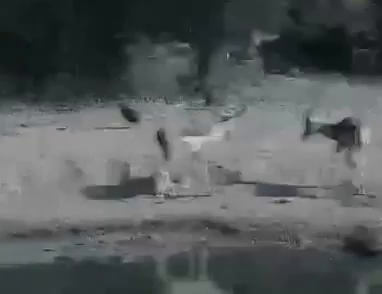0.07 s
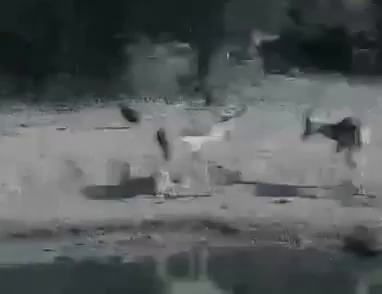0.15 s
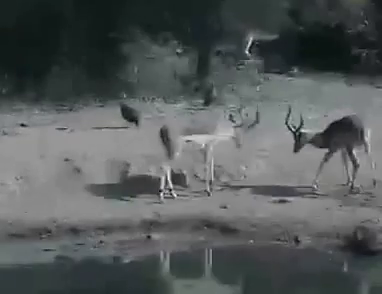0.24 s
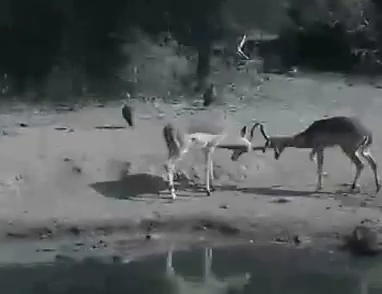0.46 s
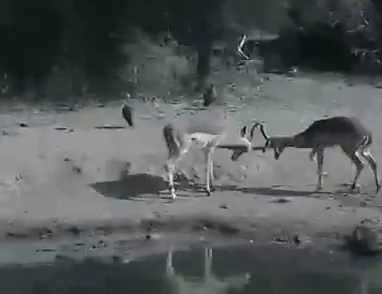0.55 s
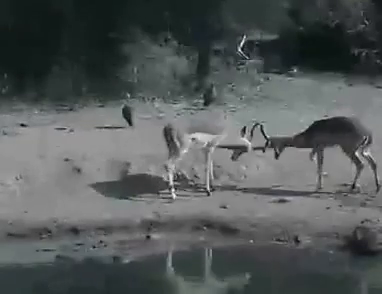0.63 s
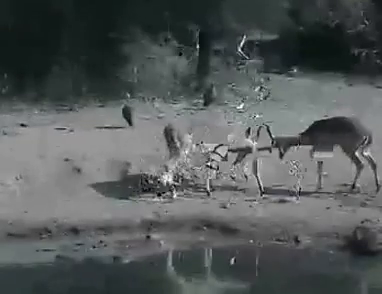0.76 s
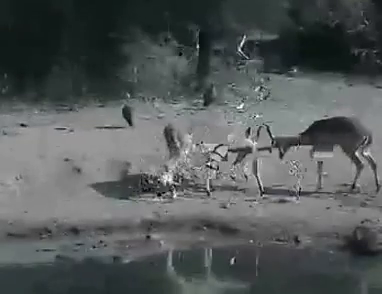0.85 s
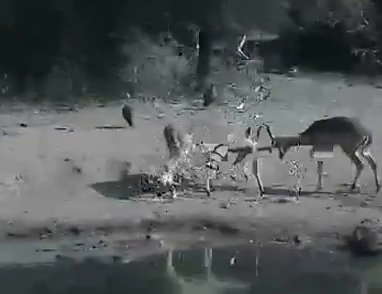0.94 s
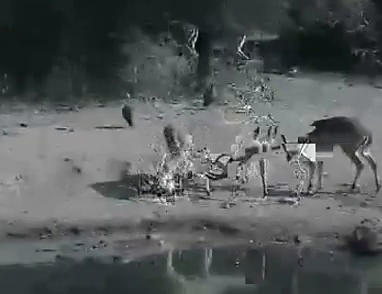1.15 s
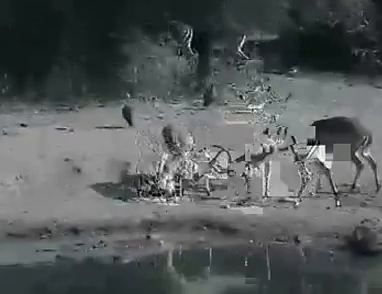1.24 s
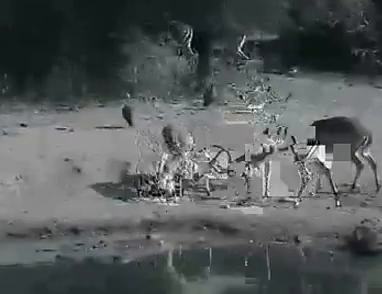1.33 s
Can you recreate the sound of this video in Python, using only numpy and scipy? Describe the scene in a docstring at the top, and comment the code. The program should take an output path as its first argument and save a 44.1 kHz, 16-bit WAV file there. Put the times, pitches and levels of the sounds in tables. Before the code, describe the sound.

A brief clatter of hollow horns clashing, over small bird calls and a quiet outdoor hush.

```python
"""Two impalas clash horns at a waterhole: each impact excites the damped modes of a hollow horn,
giving a quick rattle of knocks, some with a hard click from the sheath and a rasp from the ridges.
Hooves scuff the sand with friction noise. Birds add harsh harmonic chips and gliding pure tones.
The bush scatters these sounds back as a faint reverberation, over a steady outdoor hush."""
import sys
import numpy as np
from scipy import signal
from scipy.fft import rfft, irfft, next_fast_len
from scipy.io import wavfile
from scipy.ndimage import map_coordinates

SR = 44100
rng = np.random.default_rng(int(sys.argv[2]) if len(sys.argv) > 2 else 0)


def to_wav(s):
    """Save 16-bit WAV."""
    ch = np.atleast_2d(s).T  # columns
    pcm = np.round(np.clip(ch, -1, 1) * 32767)  # PCM
    wavfile.write(sys.argv[1], SR, pcm.astype(np.int16))


N = 61739
T = np.arange(N) / SR
EVENT_T = np.arange(SR // 6) / SR  # seconds within one knock or note


# Modes of the hollow horn. Each row: ratio to the pitch, level in dB, factor on the time to peak.
HORN_MODES = [(.77, -14.5, 2.03), (1, 1.5, 0.91), (1.18, -21, 1.5), (2.05, -25.5, 2.4), (2.38, -23.5, 1.4),
              (4, -36, 0.8)]

def horn_ring(pitch_hz, peak_s):
    """Modal resonance: each strongly damped mode swells to a peak and dies almost as fast."""
    steepness, scatter_db = 3.6, 0  # at zero scatter every knock has the same balance of modes
    ring = 0
    for ratio, db, stretch in HORN_MODES:
        age = EVENT_T / (peak_s * stretch)
        envelope = amp(rng.normal(db, scatter_db)) * (age * np.exp(1 - age)) ** steepness
        ring += envelope * np.sin(2 * np.pi * ratio * pitch_hz * EVENT_T)
    return ring


# Modes of the hard sheath. Each row: frequency in Hz, level in dB, 60 dB decay time in seconds.
SHEATH_MODES = [(1640, -12, 0.0063), (2740, -8.5, 0.0094), (4000, -13, 0.0085), (4800, -21, 0.0064),
                (5820, -20, 0.0082)]

def sheath_click():
    """Free vibration: the struck sheath's high modes decay exponentially within milliseconds."""
    return sum(amp(db) * fade(EVENT_T, t60) * np.sin(2 * np.pi * (hz * EVENT_T + rng.random()))
               for hz, db, t60 in SHEATH_MODES)


# Horn contacts. Each row: start in seconds, ring level in dB, pitch in Hz,
# time to the ring's peak in seconds, click level in dB.
CONTACTS = [(.2189, -14, 655.7, 0.0026, -28), (.2237, -50, 780, 0.0022, -11.5),
            (.2251, -17, 690, .0034, -33), (.2478, -32, 680, 0.0033, -27.5), (.2522, -37, 670, 0.0039, -53),
            (.2785, -33.5, 594, 0.0023, -34), (.2832, -28.5, 582, 0.0029, -29),
            (.2950, -28, 706, .003, -40), (.3133, -17, 660.5, 0.0054, -34),
            (.3212, -17.5, 724.4, 0.0055, -47), (.3269, -28, 758, 0.0034, -44),
            (.3305, -36, 774, 0.0017, -38), (.3364, -48, 685, 0.0021, -46),
            (.3408, -22.5, 678, 0.0027, -45), (.3459, -22.5, 700, 0.0023, -40),
            (.3518, -33, 666, 0.0037, -50), (.4108, -25, 572, .0027, -36), (.4162, -28.5, 515, .0033, -37),
            (.4252, -26, 637, .0031, -52), (.4355, -38, 523, 0.0026, -50)]
# Spectrum of horn rubbing on horn. Each row: frequency in Hz, relative level in dB.
FRICTION_SPECTRUM = [(300, -2), (1000, 0), (1650, 5.5), (2200, -3.5), (2700, 3.5), (3400, -6.5),
                     (4200, -3.5), (6200, -11.5), (7400, -19), (10500, -25)]

def horns():
    """Impact and friction: each contact clicks, rasps and rings at a pitch set by where it lands."""
    rise_s, burst_db, burst_t60_s = 0.00057, -6, 0.006
    rasp_db, rasp_t60_s = -21, 0.036
    cutoff_hz = 414  # a slender horn radiates little below this
    modes, friction = np.zeros(N), np.zeros(N)
    attack = 1 - np.exp(-EVENT_T / rise_s)
    for start, ring_db, pitch_hz, peak_s, click_db in CONTACTS:
        ring = amp(ring_db) * horn_ring(pitch_hz, peak_s)
        click = amp(click_db) * attack * sheath_click()
        add(modes, start, ring + click)
        burst = amp(click_db + burst_db) * fade(EVENT_T, burst_t60_s)  # the noisy part of the click
        rasp = amp(ring_db + rasp_db) * fade(EVENT_T, rasp_t60_s)  # the ridges scrape on
        add(friction, start, attack * (burst + rasp))
    clash = modes + friction * noise(FRICTION_SPECTRUM)
    return filtered(clash, lambda hz: 1 - 1 / (1 + (hz / cutoff_hz) ** 10))


# Hoof scuffs. Each row: centre in seconds, half-width in seconds, level in dB.
HOOF_SCUFFS = [(.025, 0.012, -44), (0.883, .006, -41.5), (0.913, 0.018, -47), (1.204, 0.0036, -46),
               (1.366, 0.014, -49.5)]
# Spectrum of scuffed sand. Each row: frequency in Hz, relative level in dB.
SAND_SPECTRUM = [(30, 2), (60, 7.5), (150, -5), (700, 1.5), (1500, -6), (3000, -11), (6000, -14.5),
                 (7500, -33), (10500, -36.5)]

def hooves():
    """Granular friction: hooves in dry sand make soft noise bursts with Gaussian envelopes."""
    envelope = sum(amp(db) * np.exp(-((T - centre) / half_width) ** 2)
                   for centre, half_width, db in HOOF_SCUFFS)
    return noise(SAND_SPECTRUM) * envelope


# Bird chips. Each row: peak time in seconds, pitch in Hz, level in dB, relative harshness in dB.
BIRD_CHIPS = [(.071, 1744, -40, -10), (0.233, 1645, -32.5, -24), (0.3076, 1713, -29, 0.5),
              (0.96, 1760, -46, -16), (1.1167, 1715, -32.5, 2)]
# Overtones of a chip. Each row: multiple of the pitch, relative level in dB.
CHIP_HARMONICS = [(2, -0.5), (3, -7.5), (4, -29)]
# Spectrum of a chip's rasp. Each row: frequency in Hz, relative level in dB.
RASP_SPECTRUM = [(1000, -29), (1700, -5), (3400, -2.5), (5300, -1), (6600, -8.5), (8000, -8), (10500, -17)]

def bird_chips():
    """Nonlinear voicing: overtones and rasp break out at the peak of each short, falling call."""
    rise_s, fall_s, sag_hz_per_s = 0.0026, 0.0049, 15000
    jitter_rad, rasp_db = 0.22, -15
    out = np.zeros(N)
    for peak_s, hz, db, harsh_db in BIRD_CHIPS:
        t = T - peak_s
        phase = 2 * np.pi * (hz * t - sag_hz_per_s * t ** 2 / 2) + jitter_rad * wobble(900)
        effort = np.exp(-(t / np.where(t < 0, rise_s, fall_s)) ** 2)
        overtones = sum(amp(level) * np.sin(k * phase) for k, level in CHIP_HARMONICS)
        harshness = effort * overtones + amp(rasp_db) * noise(RASP_SPECTRUM)
        out += amp(db) * effort * (np.sin(phase) + amp(harsh_db) * harshness)
    return out


# Whistled notes. Each row: start and length in seconds, first, middle and last pitch in Hz, level in dB.
BIRD_NOTES = [(0, 0.11, 3273, 3280, 3350, -53), (0.05, 0.022, 4600, 4200, 3740, -51.5),
              (.124, 0.02, 3820, 3700, 3600, -49.5), (0.176, 0.045, 4450, 4950, 3900, -50.5),
              (0.275, .008, 3900, 4090, 4200, -44), (.286, 0.019, 4360, 4200, 3980, -42.5),
              (.400, 0.014, 3570, 3414, 3330, -45), (0.434, .03, 4200, 4250, 3900, -56.5),
              (.575, 0.02, 3225, 3160, 3070, -47), (0.588, 0.055, 3077, 3160, 3190, -54),
              (.619, 0.014, 4400, 4220, 4080, -48.5), (.644, .036, 4590, 4820, 4480, -54),
              (0.652, 0.021, 5250, 5380, 5250, -55), (0.678, 0.039, 4600, 4500, 4620, -59.5),
              (0.698, 0.008, 3420, 3140, 2650, -42), (.706, 0.024, 2580, 2930, 3000, -44.5),
              (.722, 0.029, 3050, 3260, 3240, -40.5), (0.749, 0.035, 3200, 3330, 3140, -48.5),
              (0.784, 0.02, 3230, 3277, 3360, -43.5), (.808, .03, 3300, 3380, 3330, -52.5),
              (0.984, .014, 2990, 2390, 2150, -39), (0.997, 0.039, 2150, 2190, 2120, -41),
              (1.034, 0.019, 2130, 2060, 1880, -45.5), (1.054, .013, 3300, 2720, 2330, -45.5),
              (1.059, 0.041, 3680, 3530, 3250, -54), (1.07, 0.025, 2160, 2175, 2150, -42.5),
              (1.096, .022, 4490, 4260, 3930, -49.5), (1.141, 0.028, 5700, 5850, 5200, -58.5),
              (1.153, 0.0094, 5200, 4900, 4650, -39.5), (1.167, 0.016, 3450, 3494, 3470, -44.5),
              (1.258, 0.018, 5050, 5150, 5250, -56), (1.287, 0.018, 4650, 4410, 4430, -54.5),
              (1.339, 0.073, 3194, 3123, 3280, -53), (1.353, 0.019, 5530, 5426, 5640, -50)]

def bird_whistles():
    """Frequency modulation: each pure tone glides along a wavering arc through three pitches."""
    edge_s, flutter_db = 0.0041, 2
    waver = 1 + 0.011 * wobble(400)
    out = np.zeros(N)
    for start, length, *pitches, db in BIRD_NOTES:
        progress = np.minimum(EVENT_T / length, 1)
        arc_hz = np.polyval(np.polyfit([0, 0.5, 1], pitches, 2), progress)
        hz = arc_hz * np.interp(start + EVENT_T, T, waver)
        gate = np.minimum(np.minimum(progress, 1 - progress) * length / edge_s, 1)
        add(out, start, amp(db) * gate * np.sin(2 * np.pi * np.cumsum(hz) / SR))
    return out * amp(flutter_db * wobble(200))


# Reverberation of the bush. Each row: frequency in Hz, 60 dB decay time in seconds.
BUSH_DECAY = [(300, 0.2), (900, 0.36), (3000, 0.4), (9000, 0.16)]

def bush_echo(sound):
    """Diffuse scattering: the trees return a tail in which each frequency dies at its own rate."""
    hz, t, spectra = signal.stft(rng.standard_normal(SR // 2), SR, nperseg=256)
    decay = fade(t, along(BUSH_DECAY, hz)[:, None])
    _, tail = signal.istft(spectra * decay, SR, nperseg=256)
    return signal.fftconvolve(sound, tail / np.linalg.norm(tail))[:N]


# Spectrum of the outdoor background. Each row: frequency in Hz, relative level in dB.
HUSH_SPECTRUM = [(20, -2), (59, -3.5), (97, -7.5), (125, -10.5), (152, -1), (178, -11.5), (244, -7.5),
                 (290, -9), (400, -6), (540, -0.5), (700, -1.5), (900, -5), (1300, -14), (1850, -16),
                 (3200, -18), (4900, -23), (6500, -28), (7400, -38), (9800, -37.5), (11000, -50)]

def hush():
    """Ambient noise: a steady broadband hush whose level sways a little."""
    level_db, sway_db = -44.5, 0.45
    return noise(HUSH_SPECTRUM) * amp(level_db + sway_db * wobble(10))


def amp(db):
    """Decibels as an amplitude ratio."""
    return 10 ** (np.asarray(db) / 20)


def along(points, hz):
    """Interpolation of (Hz, value) points on a logarithmic frequency axis."""
    knot_hz, values = np.transpose(points)
    return np.interp(np.log(hz + 1), np.log(knot_hz + 1), values)


def wobble(rate):
    """Smooth random modulation: a spline through `rate` knots a second."""
    return map_coordinates(rng.standard_normal(int(N * rate / SR) + 4), [T * rate])


def filtered(sound, response):
    """Linear filtering: the spectrum is multiplied by a frequency response."""
    size = next_fast_len(N + 8192)
    return irfft(rfft(sound, size) * response(np.fft.rfftfreq(size, 1 / SR)), size)[:N]


def noise(spectrum):
    """Spectral shaping: white noise is coloured, then scaled to rms 1."""
    coloured = filtered(rng.standard_normal(N), lambda hz: amp(along(spectrum, hz)))
    return coloured / np.sqrt(np.mean(coloured ** 2))


def fade(t, t60):
    """Exponential decay from time zero, by 60 dB every t60 seconds."""
    return (t > 0) * amp(-60 * np.maximum(t, 0) / t60)


def add(out, start, sound):
    """Superposition of a short sound, from `start` seconds on."""
    part = out[round(start * SR):][:len(sound)]
    part += sound[:len(part)]


def scene():
    """Superposition: the fight and the birds, each with its echo, sum with the hush."""
    fight = horns() + hooves()
    birds = bird_chips() + bird_whistles()
    echoes = amp(db=-15.5) * bush_echo(fight) + amp(db=-11.5) * bush_echo(birds)
    return (fight + birds + echoes + hush())[None]


def record(dry):
    """Band limiting: a steep low-pass filter removes the highest treble."""
    cutoff_hz = 11000
    return filtered(dry[0], lambda hz: 1 / np.sqrt(1 + (hz / cutoff_hz) ** 160))[None]


dry = scene()
out = record(dry)
to_wav(out)
```